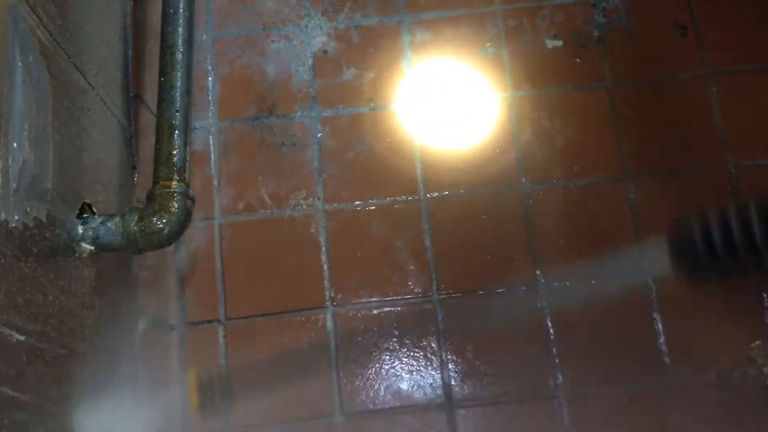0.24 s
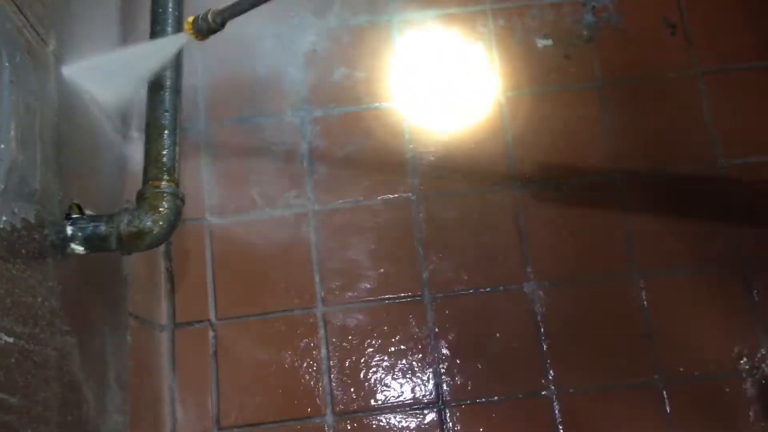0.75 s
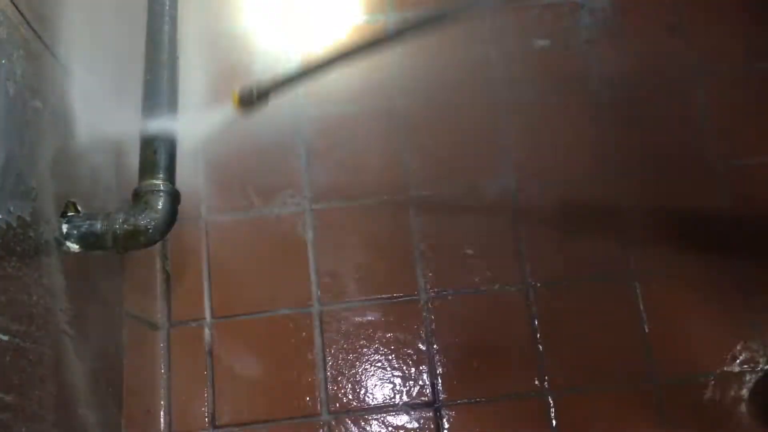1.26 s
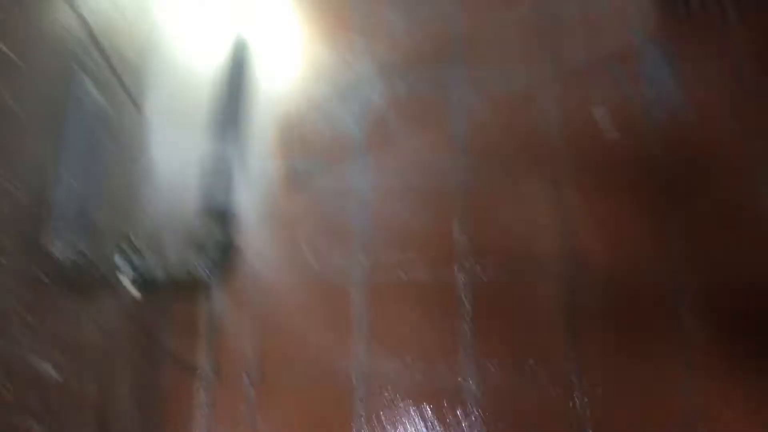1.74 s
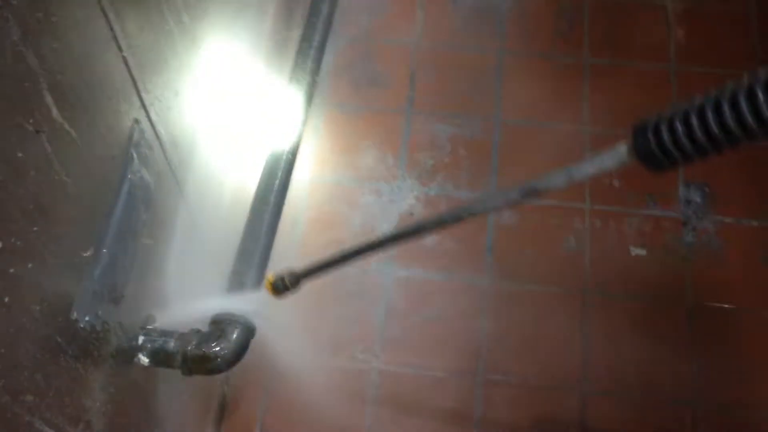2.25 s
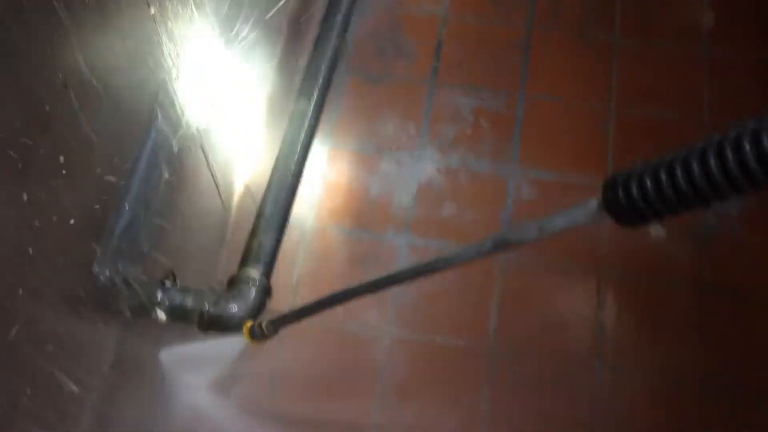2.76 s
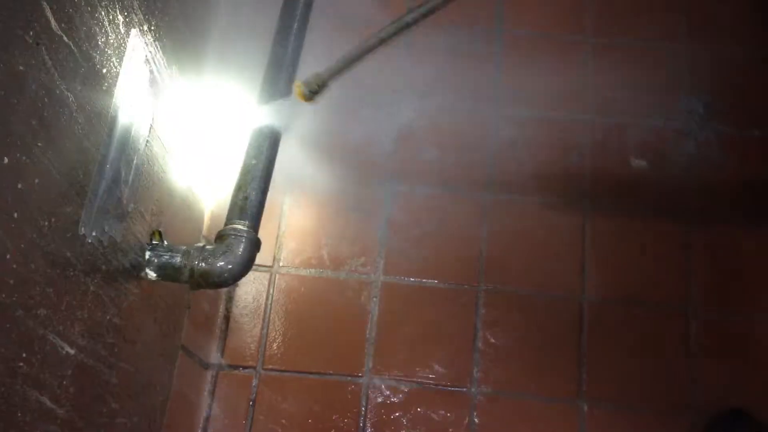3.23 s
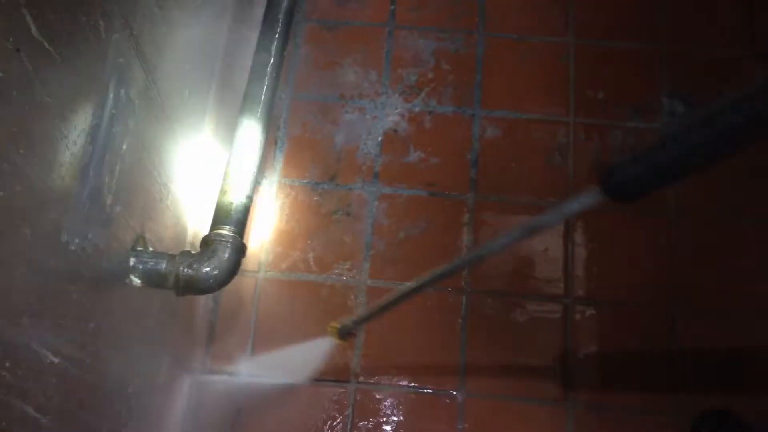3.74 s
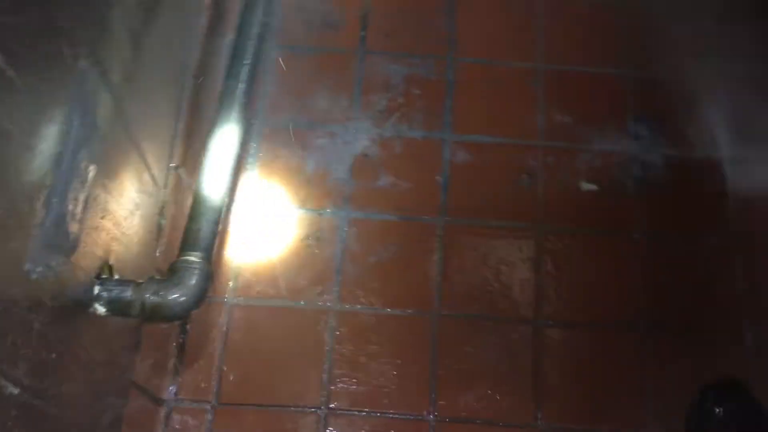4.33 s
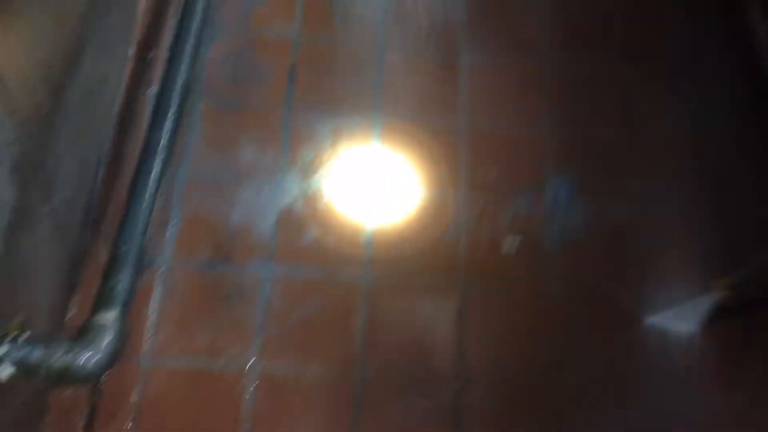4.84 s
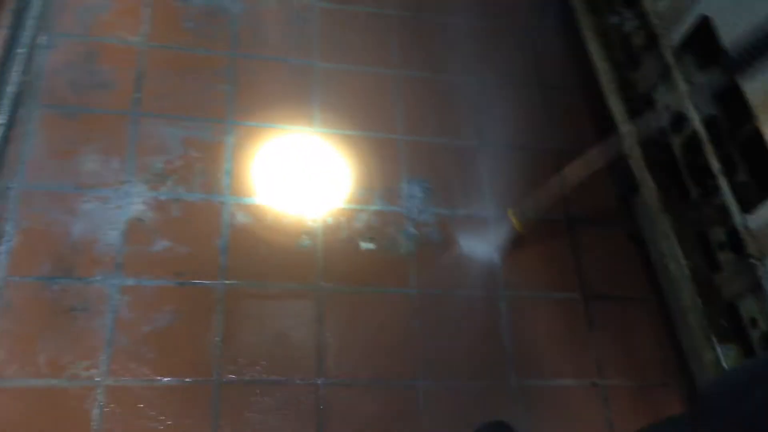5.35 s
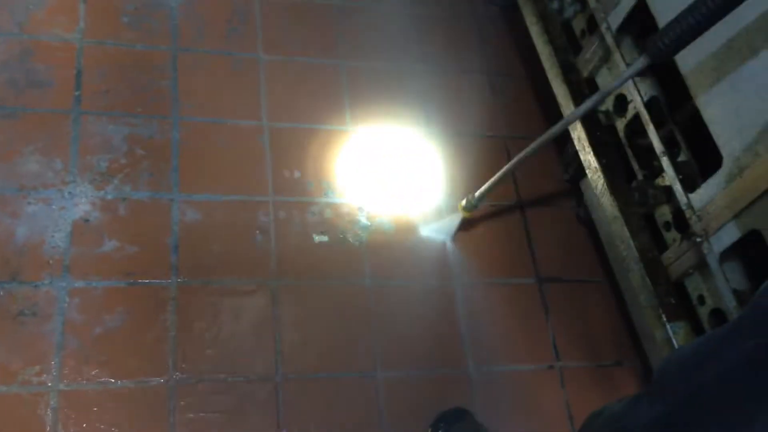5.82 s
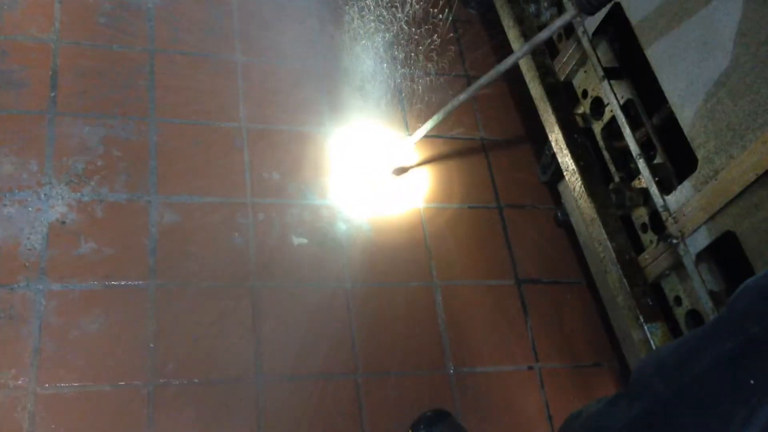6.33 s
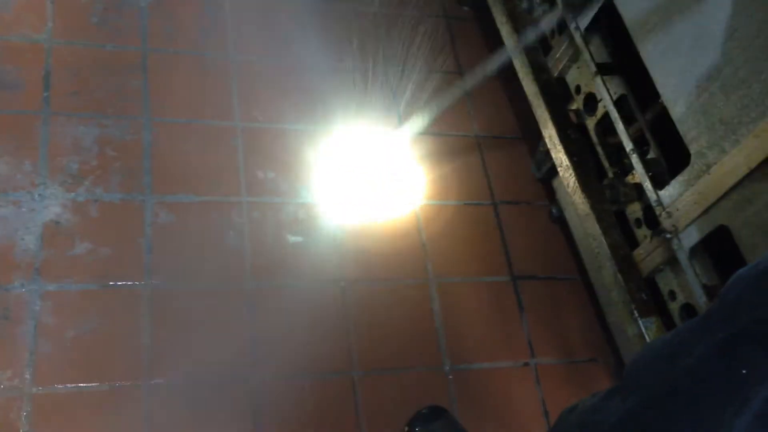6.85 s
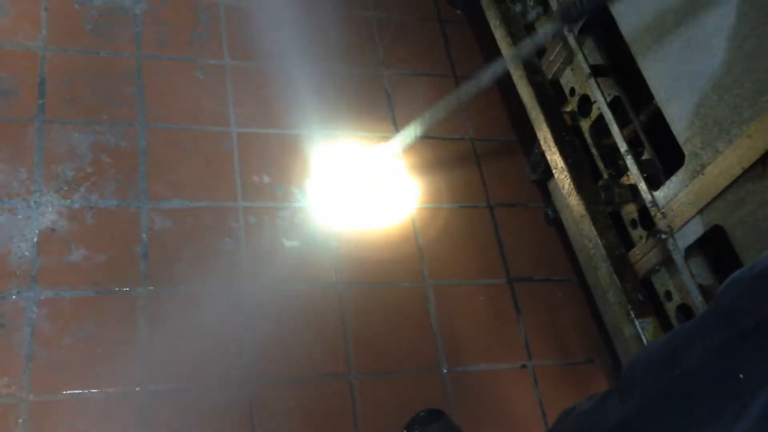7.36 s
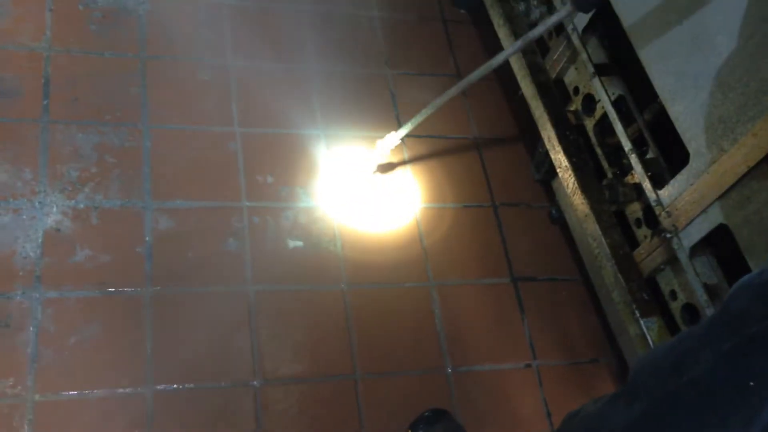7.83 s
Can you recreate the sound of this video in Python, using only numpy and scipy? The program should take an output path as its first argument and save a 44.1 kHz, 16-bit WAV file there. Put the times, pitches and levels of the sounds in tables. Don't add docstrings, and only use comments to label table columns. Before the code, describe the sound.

A dense midrange roar and bright hiss of high-pressure water run without a break, picked up by a single nearby microphone. Early on the jet flutters across sheet steel and a pipe, making the metal boom and gaps sing briefly. Halfway through it swings to the tiled floor, thinner and mistier, with fine high fizz and a short hard room echo. A motor hums low behind.

```python
import sys
import numpy as np
from scipy import signal
from scipy.fft import rfft, irfft, next_fast_len
from scipy.io import wavfile
from scipy.ndimage import uniform_filter1d, map_coordinates

SR = 44100
rng = np.random.default_rng(int(sys.argv[2]) if len(sys.argv) > 2 else 0)


def attenuation_scalar(level_db):
    decades = np.asarray(level_db, float) / 20
    return 10 ** decades


def transcribe(signal):
    frames = np.atleast_2d(signal).T
    limited = np.clip(frames, -1, 1)
    pcm = np.round(limited * 32767).astype(np.int16)
    wavfile.write(sys.argv[1], SR, pcm)


N = 356769


def rms_one(x):
    return x / np.sqrt(np.mean(x ** 2) + 1e-20)


def in_time(rows):
    s, *columns = np.transpose(rows)
    return [np.interp(np.arange(N) / SR, s, c) for c in columns]


def passing(rows):
    s, length, *columns = np.transpose(rows)
    t = np.arange(0, N + 64, 64) / SR
    shape = np.cos(np.pi * np.clip((t[:, None] - s) / length, -.5, .5)) ** 2
    return [np.interp(np.arange(N) / SR, t, shape @ c) for c in columns]


def drift(rate):
    pole = np.exp(-80 * np.pi * rate / SR)
    white = rng.standard_normal(N // 40 + 2002)
    slow = signal.lfilter([1], [1, -2 * pole, pole * pole], white)[2000:]
    return np.interp(np.arange(N) / 40, np.arange(len(slow)), rms_one(slow))


def turbulence(colour, patchy_db, modes=(), count=4):
    size = next_fast_len(N)
    hz = np.maximum(np.arange(size // 2 + 1) * SR / size, 1)
    points = np.array(colour)
    shape = attenuation_scalar(np.interp(np.log(hz), np.log(points[:, 0]), points[:, 1], left=-99))
    lift = 1 + sum(attenuation_scalar(db + 2.5) / (1 + (2 * (hz - f) / width) ** 2) for f, width, db in modes)
    spectrum = rfft(rng.standard_normal(size)) * shape * np.sqrt(lift)
    place = np.interp(np.log(hz), np.log(points[[0, -1], 0]), [0, count - 1])
    out, together = 0, drift(24.5)
    for k in range(count):
        band = irfft(spectrum * np.clip(1 - abs(place - k), 0, 1), size)[:N]
        out = out + band * attenuation_scalar(patchy_db * (1.1 * together + drift(3.4)))
    return rms_one(out)


def steel():
    # time in seconds, level in dB.
    panel_share = [(0, -27), (.3, -28), (.55, -26.5), (.75, -25.5), (1.2, -26), (1.5, -28.5), (1.85, -28.5),
                   (2.1, -29), (2.6, -29.5), (2.9, -29.5), (3.25, -27), (3.55, -26.5), (3.95, -31.5),
                   (4.2, -37), (4.65, -37), (5.7, -39), (6.8, -37), (8.09, -35)]
    # centre in seconds, length in seconds, level in dB,
    # deepening in dB.
    catches = [(.32, 0.084, -5, -2), (.54, 0.15, 5, 0), (.66, .06, 0, 4), (.82, 0.17, -0.5, 1),
               (.92, 0.16, 2.5, 1), (.99, .05, -3, 0), (1.86, 0.21, -1.5, -0.5), (2.03, .12, 2, 1),
               (2.18, .05, 1, 1), (2.39, 0.069, 3, 1.5), (2.44, .06, -4, 2), (2.52, 0.13, 1, -1.5),
               (2.68, 0.25, -4.5, 2), (2.8, 0.12, 3.5, -0.5), (2.92, 0.2, 3.5, -1.5),
               (3.0, 0.13, -3.5, 3.5), (3.04, 0.079, 3, 6), (3.1, 0.38, 2, -1.5), (3.46, 0.13, 4.5, 0),
               (3.79, 0.13, 4, 3), (4.66, 0.13, 1, 1.5), (4.84, 0.13, -1.5, 2), (6.04, 0.09, -0.5, 1),
               (6.84, 0.2, -3, 1.5), (6.96, 0.12, 1.5, .1), (7.26, .1, 0, 0), (7.35, 0.05, -4, 5),
               (7.42, .1, 1.5, 0.5)]
    share_db, = in_time(panel_share)
    return share_db - share_db.mean(), *passing(catches)


def levels():
    # time in seconds, level in dB.
    jet_force = [(0, -17), (.25, -19.5), (.5, -18), (.9, -17.5), (1.25, -17.5), (1.65, -17), (2.1, -18),
                 (2.6, -17.5), (3.1, -17.5), (3.45, -17.5), (3.7, -19), (4.1, -18.5), (4.5, -19.5),
                 (4.9, -17.5), (5.5, -17.5), (6.1, -19.5), (6.9, -19.5), (8.09, -18.5)]
    # centre in seconds, length in seconds, level in dB,
    # brightening in dB.
    surges = [(.2, .2, -2.5, -0.5), (.53, 0.11, 2.5, -0.5), (.98, 0.042, -0.5, 0), (1.04, .05, -3, 1),
              (1.07, .04, 1.5, -0.5), (1.17, 0.057, -2, 1), (1.29, 0.057, -1, -1.5), (1.77, .1, 0, 0),
              (1.86, 0.078, -0.5, 0), (2.16, 0.054, -6, 3), (2.3, .1, -1.5, 0), (2.43, 0.045, -3.5, 0.5),
              (2.7, 0.3, -1, -1), (2.9, 0.17, 2, 0), (2.99, .09, -1.5, -0.5), (2.985, .05, -.4, -.4),
              (3.46, 0.14, 1.5, -1), (3.87, 0.27, 2, 2), (4.4, .18, 0, -1), (4.8, 0.14, -2.5, 1),
              (4.87, 0.065, 3, -2), (5.04, .09, 0, 2), (5.14, 0.12, -2.5, 1), (5.2, .02, 4, .1),
              (5.81, 0.073, -1.5, 3), (6.32, .12, 0, -0.5), (7.0, 0.067, -1.5, -1), (7.17, 0.043, 1.5, 2.5)]
    # time in seconds, level in dB.
    openness = [(0, -54), (.4, -52), (.9, -52), (1.3, -49), (1.75, -46), (1.94, -54), (2.1, -53),
                (2.4, -49), (2.75, -48), (3.08, -53), (3.36, -45), (3.45, -57), (3.96, -57.5), (4.3, -46),
                (4.62, -51), (4.82, -45), (6.5, -43.5), (8.09, -42)]
    # centre in seconds, length in seconds, level in dB.
    puffs = [(.52, .06, 11), (.98, .12, 8), (1.14, .08, -5), (1.79, .08, 0), (1.85, .05, 8), (2.15, .08, 7),
             (2.38, 0.18, 6), (2.54, .1, -5), (2.87, .2, -8), (3.0, .08, 4), (3.33, .2, 1), (3.86, .1, -2),
             (4.03, .08, -3), (4.3, .15, 1), (4.64, .2, -4), (5.2, .04, 3.5), (6.13, .2, -1)]
    # time in seconds, level about its mean in dB.
    rebound = [(0, 0.5), (.3, 3.7), (.6, 1), (1.6, -1.5), (2.5, 2), (3.2, -1), (4.2, 0.5), (6.1, -6),
               (8.09, -7)]
    force, = in_time(jet_force)
    surge, bright = passing(surges)
    share, catch, deep = steel()
    roar = force - 3.5 + surge - bright + 0.21 * share
    hiss = force - 2.5 + surge + bright
    spray = force - 16.5 + surge / 2 + 2.6 * bright + in_time(rebound)[0]
    mist = in_time(openness)[0] + passing(puffs)[0] + 7
    ring = force - 7.5 + 0.4 * share + catch - deep
    return roar, hiss, spray, mist, ring


def jet():
    # time in seconds, extra path in ms, echo share from 0 to 1.
    wall_path = [(0, 0.3, 0), (.45, 0.33, 0.2), (.55, 0.15, 0.04), (1.8, 0.14, 0.33), (2.2, 0.33, 0),
                 (2.9, 0.35, 0), (2.99, 0.11, 0.03), (3.15, 0.72, 0.24), (3.5, 0.28, 0.02),
                 (3.76, 0.28, 0.16), (3.84, 0.14, 0.14), (3.9, 0.28, 0.4), (4.06, 0.6, 0.4),
                 (4.3, 0.95, 0.15), (5.2, 1.05, 0.15), (6.1, 1.05, 0.12), (6.4, 0.98, 0.16),
                 (8.09, 0.92, 0.14)]
    # frequency in Hz, density in dB per Hz.
    roar_colour = [(600, -27), (1000, -13), (1240, -1), (1700, 0), (2100, 0.5), (2550, -.5), (3000, -6.5),
                   (3800, -39), (6600, -100)]
    hiss_colour = [(1700, -30), (2600, -5.5), (3150, -1.5), (3800, -0.5), (4500, -1), (5200, -7),
                   (5700, -12), (6500, -17.5), (8500, -24), (14000, -100)]
    ring_colour = [(380, -22.5), (650, -4.5), (760, -3), (810, 1.5), (950, -0.5), (1100, -2.5),
                   (1300, -8.5), (1700, -11), (2900, -100)]
    spray_colour = [(3290, -15), (5600, -9), (6300, -9), (7400, -7.5), (10500, -18.5), (13600, -38),
                    (22000, -120)]
    mist_colour = [(5590, -35), (7800, -12), (9300, -11.5), (10300, -10), (13000, -13.5), (15300, -15.5)]
    nozzle_db = -48.5
    echo_cut_hz = 4600

    roar_db, hiss_db, spray_db, mist_db, ring_db = levels()
    splash = attenuation_scalar(roar_db) * turbulence(roar_colour, patchy_db=0.77)
    splash += attenuation_scalar(hiss_db) * turbulence(hiss_colour, patchy_db=0.62)
    splash += attenuation_scalar(ring_db) * turbulence(ring_colour, patchy_db=0.4)

    path_ms, share = in_time(wall_path)
    share = np.clip(share, 0, .9)
    delay = path_ms * SR / 1000
    dull = signal.filtfilt(*signal.butter(2, echo_cut_hz, fs=SR), splash)
    once = map_coordinates(dull, [np.arange(N) - delay], order=1, mode="mirror")
    twice = map_coordinates(dull, [np.arange(N) - 2 * delay], order=1, mode="mirror")
    mirrored = (splash + share * once + share ** 2 * twice) / np.sqrt(1 + share ** 2 + share ** 4)

    spray = attenuation_scalar(spray_db) * turbulence(spray_colour, patchy_db=1.0)
    mist = np.hypot(attenuation_scalar(mist_db), attenuation_scalar(nozzle_db)) * turbulence(mist_colour, patchy_db=0.6, count=9)
    return mirrored + spray + mist


def panel():
    # frequency in Hz, density in dB per Hz.
    drum_colour = [(140, -42), (230, -12.5), (330, -7), (400, -2.5), (533, -3.5), (620, -1.5), (740, -16),
                   (940, -3), (1580, -100)]
    # frequency in Hz, width in Hz, lift in dB.
    drum_modes = [(311, 12, 8.5), (358, 32, -13), (437, 37, -3.5), (528, 23, 6)]
    share, catch, deep = steel()
    drumming = turbulence(drum_colour, patchy_db=1.37, modes=drum_modes, count=3)
    return attenuation_scalar(-33.5 + 1.2 * share + catch / 2) * drumming


def boom():
    # frequency in Hz, density in dB per Hz.
    boom_colour = [(18, -45), (30, -21), (42, -11), (58, -1.5), (82, -8.5), (120, -1), (165, -5),
                   (230, -8.5), (320, -7.5), (450, -43)]
    shudder = turbulence(boom_colour, patchy_db=.4, count=2)
    evened = shudder / uniform_filter1d(shudder ** 2, size=4000) ** .3
    share, catch, deep = steel()
    return attenuation_scalar(-39 + 0.4 * share + catch + 1.65 * deep) * rms_one(evened)


def pump():
    # frequency in Hz, level in dB rms.
    hum_lines = [
        (59.2, -45.5),
        (118.4, -56),
        (177.6, -54),
    ]
    turn = np.cumsum(1 + .012 * drift(4.0)) / SR
    hum = np.zeros(N)
    for hz, db in hum_lines:
        waver_db = 1.5 * drift(6.0)
        hum += np.sqrt(2) * attenuation_scalar(db + waver_db) * np.sin(2 * np.pi * hz * turn)
    return hum


def swells(rows):
    out, white, t = np.zeros(N), rng.standard_normal(N), np.arange(N) / SR
    for k, (s, length, hz, width, db) in enumerate(rows):
        near = slice(max(int((s - length / 2) * SR), 0), min(int((s + length / 2) * SR), N))
        b, a = signal.iirpeak(hz, hz / width / 2, fs=SR)
        noise = np.roll(white, 9001 * k)[near]
        sung = signal.lfilter(b, a, signal.lfilter(b, a, noise))
        out[near] += attenuation_scalar(db) * rms_one(sung * np.cos(np.pi * (t[near] - s) / length))
    return out


def hollows():
    # centre in seconds, length in seconds, frequency in Hz, width in Hz, level in dB.
    hollow_tones = [(0.22, 0.99, 2410, 70.4, -30.5), (0.57, 0.19, 500, 80, -31), (.8, .3, 5000, 250, -32),
                    (0.97, 3.6, 5260, 900, -32.5), (1.52, 0.58, 526, 130, -29),
                    (1.95, 0.23, 2170, 150, -24.5), (2.24, 0.31, 1520, 130, -28), (1, 4.4, 6180, 700, -39),
                    (2.81, 0.27, 2610, 210, -25), (3.23, 0.9, 1530, 260, -31), (3.58, 0.34, 323, 79.6, -31),
                    (4.3, 0.24, 980, 120, -31), (4.62, 0.28, 330, 100, -36), (4.8, 0.39, 950, 99, -32),
                    (4.8, 0.24, 2000, 299, -25.5), (5.7, 1.6, 4870, 350, -35),
                    (5.67, 1.9, 1900, 290, -30.5), (6.02, 0.93, 3860, 480, -28),
                    (6.58, 1.3, 3200, 397, -28), (7.45, 3.7, 1130, 130, -33.5),
                    (7.3, 0.73, 3100, 440, -27.5), (7.7, .9, 4270, 400, -35), (7.4, 2.5, 5070, 597, -33.5),
                    (7.0, 3.6, 2320, 250, -34), (1.65, 0.55, 1400, 250, -31), (1.7, 0.34, 1860, 150, -29),
                    (2.03, .25, 2680, 270, -25), (2.39, 0.67, 430, 150, -35.5), (3.2, .3, 2600, 150, -34),
                    (3.54, .35, 3300, 400, -33), (4.1, .2, 2860, 200, -29.5),
                    (4.08, 0.52, 4400, 990, -31.5), (4.1, 0.52, 3740, 400, -28.5),
                    (5.4, .6, 1980, 100, -32), (6.7, .5, 4000, 150, -33), (6.85, .4, 5000, 250, -38),
                    (7.9, 0.35, 3200, 300, -30.5), (5.23, .6, 263, 80, -46.5), (1.55, 0.5, 690, 240, -32),
                    (1.23, .3, 400, 100, -36), (1.73, 0.28, 2280, 200, -30), (6.55, 0.4, 3350, 180, -30.5),
                    (4.55, 0.34, 690, 69, -36.5)]
    return swells(hollow_tones)


def slaps():
    # centre in seconds, length in seconds, frequency in Hz, width in Hz, level in dB.
    slaps_and_tones = [(1.6, 0.11, 110, 52, -54), (1.855, 0.071, 100, 57, -32), (2.18, 0.096, 130, 34, -36),
                       (3.6, 0.063, 88, 92, -37), (3.7, 0.045, 140, 88, -45), (1.024, 0.12, 126, 20, -35),
                       (3.95, 0.14, 2800, 150, -23), (4.8, 1.1, 1000, 48, -41), (4.32, 0.76, 2200, 80, -33),
                       (0.96, 1, 2300, 90, -33), (3.1, .06, 120, 67, -39), (5.8, 0.43, 2770, 160, -30),
                       (5.6, 0.27, 4100, 700, -37), (2.065, 0.21, 460, 150, -28.5),
                       (3.95, 0.37, 394, 130, -34.5), (2.06, 0.44, 320, 130, -36), (0.64, 0.28, 320, 74, -39),
                       (2.87, 0.28, 359, 75, -33), (2.9, 0.16, 870, 220, -26), (2.3, 0.11, 2800, 320, -28),
                       (3.75, 0.3, 2040, 160, -32), (3, 0.17, 6300, 1700, -34.5), (3.87, .15, 6250, 200, -36)]
    return swells(slaps_and_tones)


def fizz():
    # centre in seconds, length in seconds, frequency in Hz, width in Hz, level in dB.
    drop_fizz = [(1.2, 1.5, 11400, 1000, -51), (2.35, 0.036, 4600, 1600, -28.5),
                 (2.547, 0.17, 7000, 810, -36.5), (2.78, 0.34, 7400, 1200, -38.5),
                 (1.53, .5, 2000, 500, -28.5), (3.78, .4, 6800, 900, -41), (4.4, 0.3, 8400, 1500, -40.5),
                 (5.15, 2.6, 9700, 1000, -46.5), (7.3, 2.2, 7850, 820, -41.5), (5.4, 4.1, 5300, 270, -41),
                 (3.87, 0.18, 3700, 1300, -28), (2, 0.22, 830, 210, -34)]
    return swells(drop_fizz)


def kitchen(x, count=20):
    t60_s = .4
    out, hop, t = np.zeros(N + 2 * SR), N // count + 1, np.arange(SR // 2) / SR
    fade, padded = np.sqrt(np.hanning(2 * hop)), np.pad(x, (hop, 2 * hop))
    for k in range(count + 1):
        echoes = rng.standard_normal(len(t)) * (t > .004)
        dull = signal.lfilter([.3], [1, -.7], echoes)
        cloud = dull * attenuation_scalar(-60 * t / t60_s) + (echoes - dull) * attenuation_scalar(-240 * t / t60_s)
        part = signal.fftconvolve(padded[k * hop:(k + 2) * hop] * fade, cloud)
        out[k * hop:k * hop + len(part)] += part
    wet = out[hop:hop + N]
    return wet * np.std(x) / np.std(wet)


def nulls(x):
    # centre in seconds, length in seconds, frequency in Hz, width in Hz, change in dB.
    reflections = [(.8, .8, 2700, 350, -3), (1.5, .6, 2900, 300, -5), (3.62, .2, 2800, 500, -4),
                   (4.3, .5, 2600, 200, -4), (5.0, .5, 2600, 150, -3), (4.65, .5, 3950, 300, -3),
                   (6.5, .7, 2800, 150, -4), (7.3, 1, 2850, 200, -2.5), (6.9, 1.5, 3930, 200, -4),
                   (6.7, .7, 4280, 150, 4), (6.6, .7, 3020, 120, 3), (7.2, .3, 6300, 1200, -4),
                   (5.97, .4, 6600, 900, -4), (5.44, .3, 6250, 700, -3), (4.74, .3, 6600, 900, -3),
                   (6.65, .2, 7500, 3000, -3), (7.8, .3, 6200, 600, -3), (4.18, .2, 7200, 1200, -3),
                   (6.2, 1.4, 430, 150, -3.5), (5.5, .8, 360, 150, -2), (6.3, .5, 400, 100, -5),
                   (7.6, .4, 750, 340, 3.5), (.3, 0.28, 580, 250, 2), (.45, .6, 5650, 300, 3),
                   (.9, .5, 5250, 200, -3), (1.75, .3, 5900, 700, 3), (2.47, .5, 1350, 200, 2.5),
                   (2.36, .3, 2100, 300, 2), (2.8, .2, 3900, 700, 2), (4.35, .3, 5900, 800, 2),
                   (5.7, .2, 950, 300, 3), (5.2, .15, 8200, 1500, 3), (3.97, .2, 1950, 300, -5),
                   (2.985, .09, 3350, 600, -6), (2.5, 1, 5600, 500, -3), (.23, .2, 10600, 2000, -3.5),
                   (3.3, .2, 10000, 2000, -3.5), (7.77, .2, 10100, 1500, -3), (.6, .15, 8700, 1500, -3),
                   (7.1, .8, 2900, 150, 2.5)]
    # centre in seconds, length in seconds, frequency in Hz,
    # width in Hz, change in dB.
    more_reflections = [(1.97, .25, 780, 280, 1.5), (3.66, 0.28, 1200, 350, -4), (1.32, .3, 420, 140, 2),
                        (0.16, .25, 250, 220, -4), (.85, .3, 300, 120, -4), (1.36, 0.43, 220, 100, -5),
                        (2.5, .25, 200, 200, -3.5), (2.42, .12, 600, 400, -2), (2.88, .08, 950, 300, 3),
                        (2.95, .06, 1700, 1500, -3), (2.62, .12, 1500, 1800, -2), (3.9, .3, 200, 250, -4),
                        (5.9, .6, 270, 150, -3), (7.9, .4, 320, 250, -4), (4.8, 1.2, 980, 100, 2),
                        (5.55, 1.2, 2000, 150, 1.5), (4.7, 1, 1500, 400, -0.5), (.55, .08, 1000, 900, 1),
                        (3.5, .25, 110, 100, 3), (4.5, .3, 210, 150, 2), (6.15, .3, 4050, 300, 2),
                        (6.7, 1, 480, 100, -2), (7.6, .9, 2950, 150, -2), (1.1, 1.6, 2860, 150, -1.5),
                        (3.62, .35, 12200, 1500, -3.5), (2.2, 3.5, 12000, 900, -2), (.4, .15, 2420, 90, 4),
                        (7.35, .4, 420, 90, -4), (3.88, .14, 7500, 3000, 2), (4.9, 1.6, 2880, 150, 2)]
    hz, t, frames = signal.stft(x, SR, nperseg=1024, noverlap=512)
    s, length, centre, width, db = np.transpose([*reflections, *more_reflections])
    swell = np.cos(np.pi * np.clip((t - s[:, None]) / length[:, None], -.5, .5)) ** 2
    patch = db * np.exp(-(2 * (hz[:, None] - centre) / width) ** 2)
    return signal.istft(frames * attenuation_scalar(patch @ swell), SR, nperseg=1024, noverlap=512)[1][:N]


def scene():
    water = jet() + panel() + hollows()
    room_db = -11
    heard = (water + attenuation_scalar(room_db) * kitchen(water)) / np.sqrt(1 + attenuation_scalar(2 * room_db))
    heard += boom() + pump() + slaps() + fizz()
    return np.array([nulls(heard)] * 2)


def holes(x):
    # frequency in Hz, level in dB.
    mask_curve = [(1500, -30), (2600, -9), (5000, -8), (6200, -5), (9000, -5), (12000, -3.5), (15000, -2.5)]
    hz, s, frames = signal.stft(x, SR, nperseg=2048, noverlap=1024, window="cosine")
    power = abs(frames) ** 2 + 1e-20
    patch = uniform_filter1d(power, size=5, axis=0)
    around = uniform_filter1d(power, size=61, axis=0)
    threshold = attenuation_scalar(2 * np.interp(hz, *np.transpose(mask_curve)))[:, None]
    mask = uniform_filter1d(around, size=3, axis=1) * threshold
    kept = frames * np.clip(patch / mask, 0, 1) ** 6
    return signal.istft(kept, SR, nperseg=2048, noverlap=1024, window="cosine")[1][:N]


def side_flashes():
    # centre in seconds, low edge in Hz, high edge in Hz, level in dB.
    flash_bands = [(2.030, 6200, 8400, -37), (3.563, 6200, 7700, -43), (3.725, 5600, 7700, -39),
                   (3.841, 4150, 5500, -27), (3.841, 6900, 10400, -36), (4.515, 5600, 7000, -41),
                   (4.979, 5100, 6300, -35), (5.141, 6900, 8400, -41), (5.559, 7600, 9000, -41),
                   (5.908, 4600, 5800, -34), (7.951, 6900, 9000, -40)]
    out, hz = np.zeros(N), np.arange(1025) * SR / 2048
    for s, low, high, db in flash_bands:
        band = irfft(rfft(rng.standard_normal(2048)) * (hz > low) * (hz < high))
        start = int(s * SR) - 1024
        out[start:start + 2048] += attenuation_scalar(db + 2) * rms_one(band) * np.hanning(2048) ** 3
    return out * [[1], [-1]]


def band_limit(x):
    return signal.sosfilt(signal.butter(12, 15250, fs=SR, output="sos"), x)


def record(dry):
    # frequency in Hz, gain in dB.
    port_dip = [(2530, -0.5), (2640, -2.5), (2820, -3.5), (3010, -7), (3075, 0)]
    size = next_fast_len(N)
    dip = attenuation_scalar(np.interp(np.arange(size // 2 + 1) * SR / size, *np.transpose(port_dip)))
    soft = 1.3 * np.tanh(dry[0] / 1.3)
    mono = holes(irfft(rfft(soft, size) * dip, size)[:N])
    return band_limit(mono + side_flashes())


dry = scene()
out = record(dry)
transcribe(out)
```